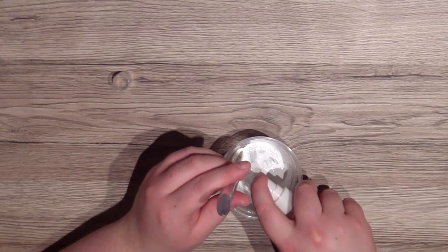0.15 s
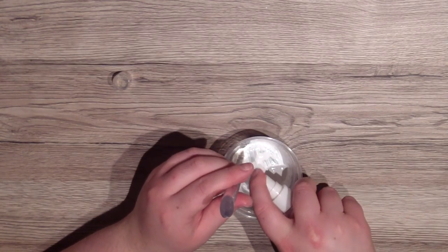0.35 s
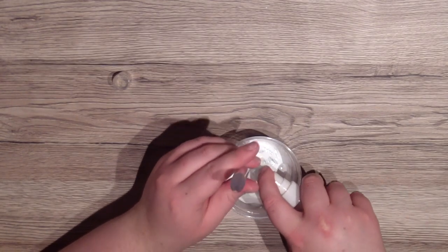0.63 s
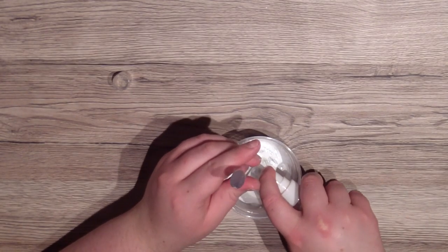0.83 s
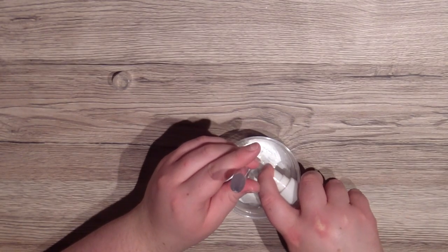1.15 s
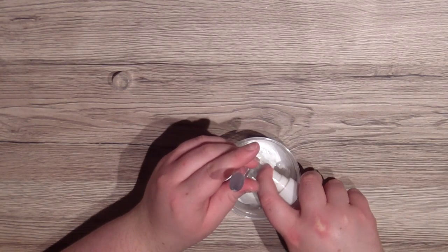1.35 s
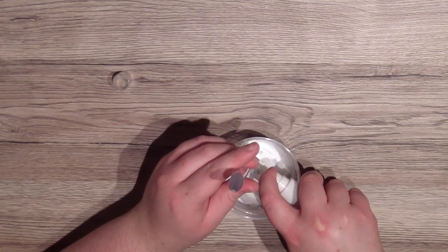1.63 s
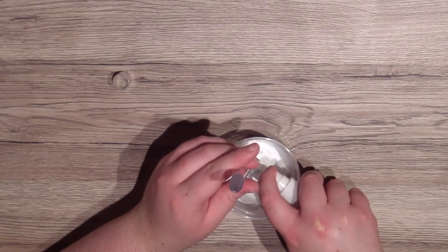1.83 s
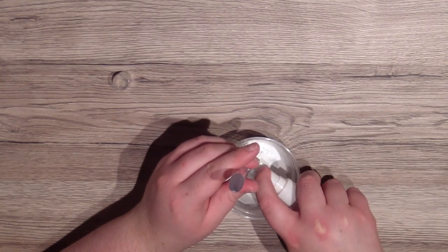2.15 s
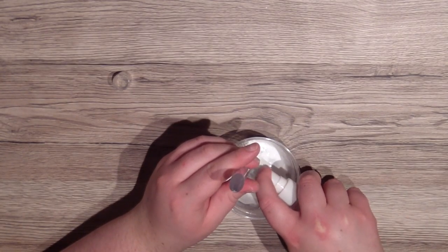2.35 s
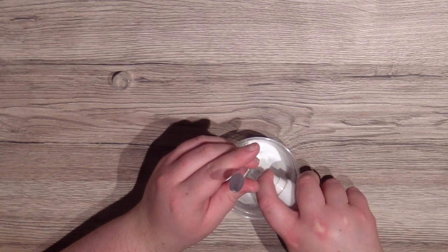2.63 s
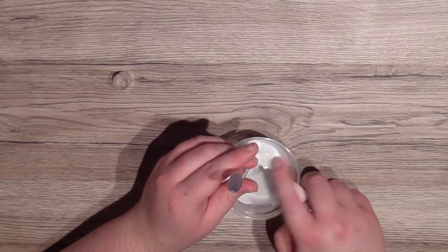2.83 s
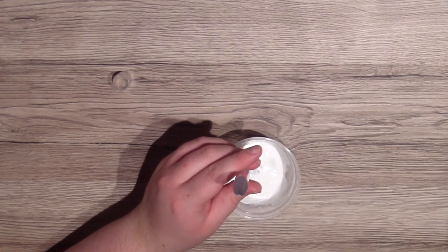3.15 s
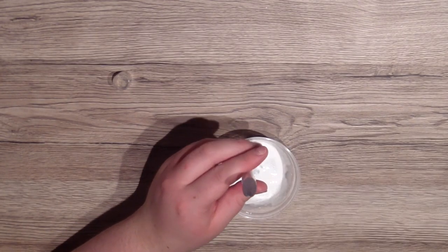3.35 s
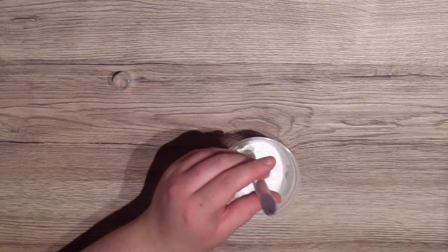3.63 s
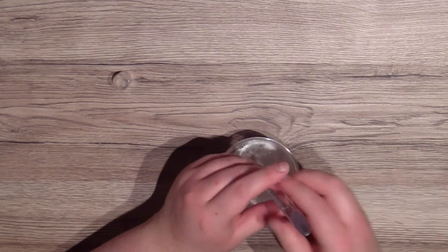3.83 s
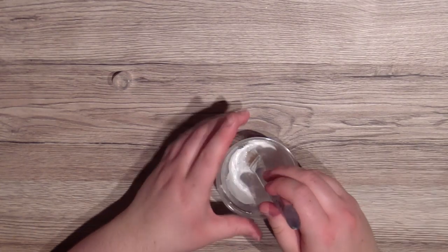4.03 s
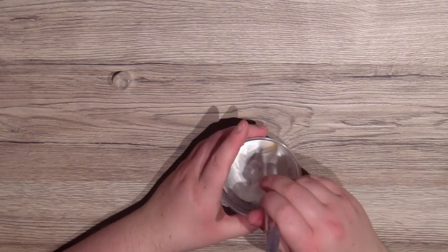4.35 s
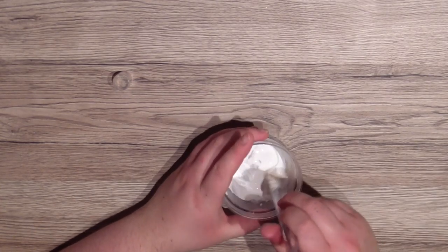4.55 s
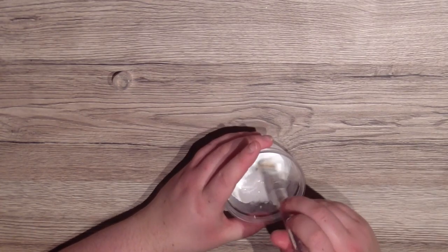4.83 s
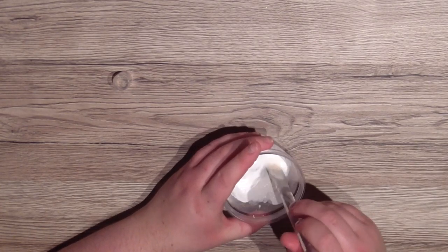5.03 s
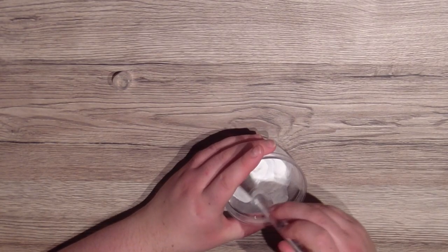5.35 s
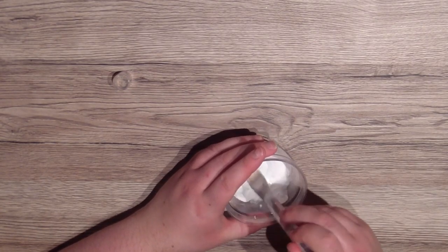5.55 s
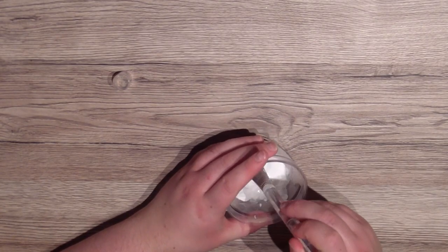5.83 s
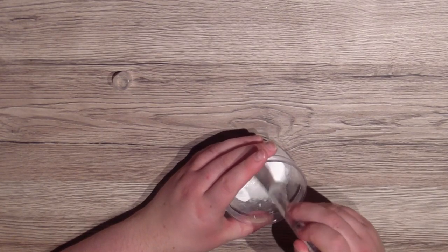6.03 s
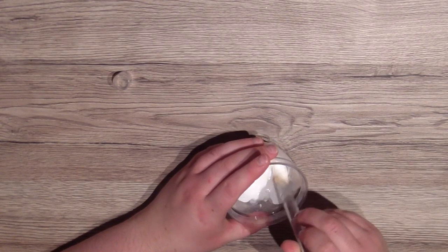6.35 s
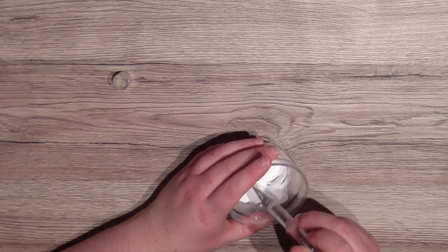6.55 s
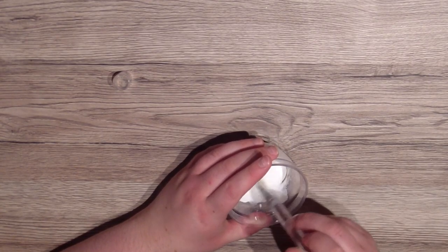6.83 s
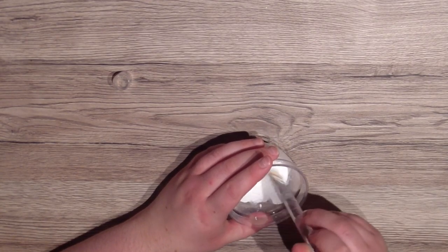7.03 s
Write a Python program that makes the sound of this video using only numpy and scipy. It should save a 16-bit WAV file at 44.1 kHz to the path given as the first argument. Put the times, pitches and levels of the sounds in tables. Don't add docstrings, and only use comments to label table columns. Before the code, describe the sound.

A pump bottle snaps about five times a second, squirting into a cup, before being thumped down on wood; faint wet stirring follows.

```python
import sys
import numpy as np
from scipy import signal
from scipy.fft import rfft, irfft, next_fast_len
from scipy.io import wavfile

SR = 44100
rng = np.random.default_rng(int(sys.argv[2]) if len(sys.argv) > 2 else 0)


def materialize(psi):
    bounded = np.clip(np.atleast_2d(psi).T, -1, 1)
    quanta = np.round(bounded * 32767).astype(np.int16)
    wavfile.write(sys.argv[1], SR, quanta)


def level_to_linear(level):
    exponent = np.asarray(level, float) / 20
    return 10 ** exponent


N = 317079

# (frequency [Hz], density [dB per Hz])
TONE_SPECTRUM = [(12, -52), (20, -1.5), (31, -13.5), (53, 1.5), (77, -13), (114, -8.5), (174, -17),
                 (237, -13.5), (351, -18), (428, -17), (1350, -27), (2510, -27.5), (13900, -34.5),
                 (15200, -37), (16500, -45)]
# (frequency [Hz], correlation [0-1])
TONE_LIKENESS = [(40, 0.84), (130, 0.55), (600, 0.59), (1500, 0.32), (4000, 0.096), (15000, 0.15)]
# (time [s], level [dB])
RUMBLE_SWELL = [(0.0, -46), (0.44, -76), (0.88, -52.5), (1.96, -63), (2.26, -59), (2.54, -59), (3.36, -64),
                (3.54, -47), (5.08, -55.5), (5.69, -44.5), (6.37, -55), (7.19, -48)]
# (time [s], level [dB])
TRICKLE_LEVEL = [(0, -43), (.06, -59), (.15, -59), (.4, -63.5), (.62, -61), (.9, -57), (2.8, -66),
                 (2.95, -70), (7.19, -71)]
# (time [s], length [s], wall ring [dB], rim ring [dB], wet hiss [dB])
CUP_STROKES = [(0.001, 0.028, -61, -70, -63), (2.99, 0.043, -80, -72, -63), (4.054, .04, -63, -64, -64.5),
               (4.174, 0.046, -64, -53, -58), (4.228, 0.18, -68, -56, -64.5),
               (4.394, 0.13, -70, -61.5, -59), (4.566, 0.035, -56, -58, -60.5),
               (4.67, 0.13, -55.5, -81, -62.5), (4.827, 0.12, -58, -62, -58), (5.01, 0.1, -56.5, -66, -62),
               (5.144, 0.095, -56.5, -70, -60.5), (5.333, 0.17, -66, -73, -61.5),
               (5.627, 0.097, -58.5, -79, -59.5), (5.863, 0.1, -57.5, -81, -61.5),
               (6, 0.052, -62.5, -78, -70), (6.111, 0.067, -53, -70, -58), (6.277, 0.073, -56, -60.5, -62),
               (6.359, .13, -61, -82, -59.5), (6.514, 0.053, -69, -61, -85),
               (6.725, 0.032, -52.5, -53, -62), (6.785, 0.065, -55, -70, -61), (6.903, 0.17, -66, -85, -66),
               (7.07, 0.089, -56.5, -59, -59.5)]
# (frequency [Hz], density [dB per Hz])
FILM_SPECTRUM = [(1060, -26), (1800, 1.5), (2790, -4), (3320, 2.5), (5490, -3), (9000, 4), (15100, -1),
                 (16000, -58.5)]
# (time [s], level [dB], frequency [Hz], T60 [s])
NICKS = [(.009, -31, 500, .03), (.194, -31, 505, .035), (.662, -22, 9000, .001), (.6622, -25, 4200, .002),
         (.663, -27, 2450, .035), (1.177, -31, 5000, .0015), (2.835, -39, 7800, .012),
         (3.439, -20, 13000, .001), (3.946, -35, 1950, .012), (3.947, -36, 4100, .008),
         (4.713, -36, 5600, .002), (4.7135, -27, 1290, .02), (4.903, -35, 2800, .006),
         (4.915, -40, 3300, .01), (4.925, -38, 3800, .01), (4.945, -38, 9000, .004), (6.25, -40, 620, .06),
         (6.28, -41, 650, .05), (6.74, -38, 3500, .008), (6.757, -39, 3700, .008), (6.772, -38, 3300, .008)]
# (time [s], peak [dB], low body re peak [dB], valve ball re peak [dB],
# grip [dB], where a squeezed bottle favours its lowest mode)
HEAD_DOWN = [(0.193, -8, -18.5, -11, -0.5), (0.7333, -10.5, -13.5, -4, 2.5), (0.9608, -7, -13, -6, -0.5),
             (1.19, -8, -11, -5, 0.5), (1.3984, -6.5, -14, -7.5, 0), (1.5979, -5.5, -13.5, -8, 0),
             (1.8104, -5.5, -14, -10.5, 1.5), (2.0006, -7.5, -13.5, -7.5, 4.5),
             (2.2018, -5.5, -13.5, -6.5, 0), (2.3946, -5, -14.5, -6.5, 0.5), (2.585, -7.5, -10.5, -3, -2)]
# (time [s], peak [dB], low body re peak [dB])
HEAD_BACK = [(0.3668, -28, -36), (0.8959, -29.5, -0.5), (1.0942, -27.5, -5.5), (1.3176, -27.5, -24),
             (1.52, -27, -11), (2.1236, -29, -9), (2.515, -31, -15), (2.714, -43, -23)]
# (frequency [Hz], density [dB per Hz])
SNAP_SPECTRUM = [(590, -25.5), (1000, -4), (1700, -6.5), (2800, -6), (3900, -3.5), (6310, -11),
                 (6770, -2.5), (11200, -2.5), (15600, -15), (16500, -3.5)]
# (frequency [Hz], level [dB], T60 [s])
BOTTLE_MODES = [(400, -6.5, 0.036), (609.6, -1, 0.068), (1750, -5, 0.025), (1990, -4.5, 0.034),
                (2170, 2.5, 0.0077), (2370, -4, 0.017), (2660, -15, .02)]
# (time [s], peak [dB], base share [dB], wall share [dB], push into the table [dB])
CUP_BUMPS = [(0.6623, 0.5, -24, -0.5, -21.5), (0.666, -22, -2, 11, -40), (0.671, -22, -14, 14, -40),
             (0.678, -35, -13, 10, -40), (0.688, -26, -16, 8, -40), (0.6962, -24, -7, 10, -33),
             (0.705, -25, -2, 12, -40), (0.7205, -34, -17, -3, -40), (0.7262, -27, -17, -6, -40),
             (0.7472, -19, -16, 3, -40), (0.756, -30, -13, -5, -40), (0.861, -23, -12, 11, -8),
             (1.091, -30, -6, 14.5, -3), (1.098, -36, -8, 14, -30), (1.176, -12.5, -13, 6, -13.5),
             (1.326, -34.5, 5, 14, -21), (1.332, -32, 3, 9, -30), (2.749, -29, -5, 6, -23),
             (4.22, -35, 4, 7, -1), (4.713, -21.5, -1.5, 13, -26), (4.7172, -26, -1, -7, -30),
             (4.738, -46, -3, 3, -26), (4.777, -46, -3, 6, -26), (5.36, -34.5, -19, -11, -26),
             (6.11, -36, -19, -7, -22), (6.77, -45, -4, -8, -20), (6.806, -35, -11, -5, -26)]
# (frequency [Hz], level [dB], T60 [s])
CUP_MODES = [(385, 2, 0.025), (560, -3, 0.04), (662, 2, 0.042), (895, -18, 0.027), (1010, 1, 0.012),
             (1055, -21.5, 0.022), (1127, -3, 0.019), (1287, 2, 0.021), (1318, 5, 0.028),
             (1480, 8.5, 0.023), (1610, -7, 0.016)]
# (time [s], level [dB], T60 [s])
WALL_CHATTER = [
    (0.6615, -30, 0.062),
    (0.664, -49, 0.18),
    (0.696, -50, 0.071),
    (1.1765, -35.5, 0.07),
]
# (frequency [Hz], density [dB per Hz])
CHATTER_SPECTRUM = [(1200, -27), (1900, 9), (2500, -11), (3300, -4), (5000, -12.5), (9000, -16),
                    (15000, -20)]
# (valve opens [s], stays open [s], level [dB], cup ring re jet [dB])
WATER_JETS = [(0.998, 0.061, -23, -34), (1.229, 0.052, -24, -23), (1.43, 0.056, -23, -17),
              (1.628, 0.065, -23, -18), (1.841, 0.063, -23, -23), (2.033, 0.056, -23.5, -18),
              (2.231, 0.067, -22, -13.5), (2.424, 0.06, -22.5, -17.5), (2.617, 0.073, -23, -13)]
# (frequency [Hz], density [dB per Hz])
MIST_SPECTRUM = [(410, -33), (700, -49), (768, -21), (1050, -12.5), (1200, -30), (1630, 1), (1790, -12.5),
                 (3120, -5.5), (5960, -9.5), (8520, -3.5), (14500, -2), (15900, -5.5), (16500, -51)]
# (frequency [Hz], density [dB per Hz])
DROP_SPECTRUM = [(700, -23), (1600, 12), (3000, -25), (4600, 5), (5100, 17), (5700, -18), (9000, -18),
                 (14000, -22), (16000, -22)]
# (time [s], base [dB], push into the table [dB])
LANDING = [
    (3.439, -3, -5),
    (3.4425, -10, -32),
    (3.4514, -28, -17),
    (3.47, -21, -20),
    (3.4909, -22, -26),
    (3.503, -28, -31),
    (3.525, -26.5, -33),
]
# (frequency [Hz], level [dB], T60 [s])
TABLE_MODES = [(65.8, 6, 0.46), (91.6, -6, 0.55), (127.9, 1, 0.38), (149, -4, 0.5), (197, -1.5, 0.32),
               (245.7, -5, 0.56), (247, 2, 0.18), (275, -18, 0.2), (317.5, 3.5, 0.26), (402, -2, 0.23),
               (419, 2, 0.26), (483, -14, 0.3), (524, -30, 0.17), (635, -20, .2)]
# (frequency [Hz], level [dB], T60 [s])
BASE_MODES = [(725, -19, 0.081), (780, -17, 0.033), (1050, -13, .12), (1147, -15, 0.06), (1250, -14, 0.066),
              (1308, -2, 0.098), (1380, -3.5, 0.071), (1472, -23, 0.095), (1640, -22, 0.039),
              (1970, -30, 0.044), (2410, -6, 0.025), (2645, -3, 0.016), (2920, -26, 0.044),
              (4220, -35, 0.0099)]
# (frequency [Hz], density [dB per Hz])
RATTLE_SPECTRUM = [(260, 0.5), (450, 1.5), (600, -6), (748, -5.5), (919, -11), (1040, -7), (1300, -6),
                   (1730, -15.5), (3040, -17), (3340, -24), (4050, -20), (5120, -32.5), (9240, -30.5),
                   (12000, -45), (15600, -36), (22000, -120)]
# (time [s], peak [dB])
LOOSE_HEAD = [(3.453, -25), (3.4644, -33), (3.469, -22.5), (3.4844, -31), (3.5034, -37), (3.5164, -44),
              (3.5254, -39), (3.5523, -48), (3.553, -42)]
# (time [s], length [s], level [dB])
FINGER_SLIPS = [
    (3.88, .075, -68),
    (3.97, .045, -61),
    (4.03, .05, -53),
    (4.095, .05, -51),
]
# (frequency [Hz], T60 [s])
ROOM_DECAY = [(60, .45), (300, .4), (1500, .4), (4000, .36), (8000, .29), (14000, .24)]
# (frequency [Hz], side re mid [dB])
ROOM_WIDTH = [(60, -13), (300, -29), (1500, -30), (5000, -34), (14000, 0)]
# (frequency [Hz], level [dB])
ROOM_LEVEL = [(200, -0.5), (600, -3), (1400, -5.5), (3000, -8), (6000, -6), (12000, -15)]
# (frequency [Hz], side re mid [dB])
NEAR_WIDTH = [(300, -23), (1500, -35.5), (4000, -36), (8000, -14.5), (11000, -20), (14000, -6.5)]


def in_time(rows):
    s, *columns = np.transpose(rows)
    return [np.interp(np.arange(N) / SR, s, c) for c in columns]


def at_hz(points, hz):
    table = np.array(points)
    return np.interp(np.log(hz + 1), np.log(table[:, 0]), table[:, 1])


def coloured(spectrum, white):
    count = white.shape[-1]
    size = next_fast_len(count)
    gain = level_to_linear(at_hz(spectrum, np.arange(size // 2 + 1) * SR / size))
    x = irfft(rfft(white, size) * gain, size)[..., :count]
    return x / np.sqrt(np.mean(x ** 2))


def gritty(spread_db):
    return rng.standard_normal(N) * level_to_linear(spread_db * np.minimum(rng.exponential(1, N), 5))


def drift(rate):
    r = np.exp(-2 * np.pi * rate / SR)
    slow = signal.lfilter([1], [1, -2 * r, r * r], rng.standard_normal(N + SR))[SR:]
    return slow / slow.std()


def spikes(times, levels_db):
    out = np.full(N, 1e-18)
    out[np.round(np.asarray(times) * SR).astype(int)] = level_to_linear(levels_db)
    return out


def fading(x, t60):
    return signal.lfilter([1], [1, -level_to_linear(-60 / (t60 * SR))], x)


def ring(x, hz, t60):
    r = level_to_linear(-60 / (t60 * SR))
    w = 2 * np.pi * hz / SR
    return signal.lfilter([0, np.sin(w)], [1, -2 * r * np.cos(w), r * r], x)


def passed(x, hz, kind):
    return signal.sosfilt(signal.butter(2, hz, kind, fs=SR, output="sos"), x)


def unit(x):
    return x / x.std()


def strike(times, levels_db, modes, scatter_db, chatter_s, chatter, sign=-1):
    levels_db = levels_db + scatter_db * rng.standard_normal((len(times), len(modes)))
    grains = chatter * gritty(7.48) / np.sqrt(chatter_s * SR / 7)
    out = 0
    for k, (hz, db, t60) in enumerate(modes):
        blows = spikes(times, levels_db[:, k] + db)
        burst = fading(blows, chatter_s) * np.roll(grains, 997 * k)
        out = out + sign ** k * ring(blows + burst, hz, t60)
    return out


def stroke(start, length, attack_s, release_db_per_s):
    span = slice(int(start * SR), min(N, int((start + length + .4) * SR)))
    t = np.arange(span.start, span.stop) / SR - start
    gain = np.clip(t / attack_s, 0, 1) * level_to_linear(-release_db_per_s * np.clip(t - length, 0, 1))
    return span, gain, np.clip(t / length, 0, 1)


def floor():
    likeness = [(hz, np.clip(c, 0, .99)) for hz, c in TONE_LIKENESS]
    mid = [(hz, 10 * np.log10(1 + c)) for hz, c in likeness]
    side = [(hz, 10 * np.log10(1 - c)) for hz, c in likeness]
    hiss = coloured(TONE_SPECTRUM, rng.standard_normal((2, N)))
    grid = np.arange(N // 2 + 1) * SR / N
    both, apart = (irfft(rfft(h) * level_to_linear(at_hz(p, grid)), N) / 2 ** .5 for h, p in zip(hiss, (mid, side)))
    tone = level_to_linear(-46.5) * (both + apart * [[1], [-1]])

    wander = 1 + 0.049 * drift(2.97)
    swell = level_to_linear(in_time(RUMBLE_SWELL)[0] + 2.0 + 2 * drift(2.4))
    rumble = swell * np.sin(2 * np.pi * np.cumsum(50 * wander) / SR)

    turn = 2 * np.pi * np.arange(N) / SR
    throb = 1 + .5 * np.sin(50 * turn)
    whine = level_to_linear(-64 + 1.5 * drift(5.0)) * throb * np.sin(15650 * turn)
    return tone + rumble * level_to_linear([[1.2], [-1.2]]) + whine * level_to_linear([[1.5], [-1.5]])


def settling():
    cavity_hz = 1476
    trickle = gritty(2.4) * level_to_linear(2.5 * drift(18))
    air = ring(ring(trickle, cavity_hz, 0.014), cavity_hz, 0.002)
    return level_to_linear(in_time(TRICKLE_LEVEL)[0]) * unit(air)


def stirring():
    attack_s, lift_db_per_s = 0.014, 409
    ring_sag_db, film_rise_db = 1, 5.5
    wall_gain, rim_gain, hiss_gain = np.zeros((3, N))
    for start, length, wall_db, rim_db, hiss_db in CUP_STROKES:
        span, contact, along = stroke(start, length, attack_s, lift_db_per_s)
        wall_gain[span] += contact * level_to_linear(wall_db - ring_sag_db * (along - 2.0))
        rim_gain[span] += contact * level_to_linear(rim_db - ring_sag_db * (along - 2.5))
        hiss_gain[span] += contact * level_to_linear(hiss_db + film_rise_db * (along - .5))
    slips = gritty(4.1) * level_to_linear(3.8 * drift(33))
    wall = ring(slips, 1315, 0.018) - 0.7 * ring(slips, 1170, 0.016) - 0.7 * ring(slips, 1470, 0.015)
    wall = wall + level_to_linear(-14) * ring(slips, 3300, 0.012)
    rim = ring(slips, 1510, 0.03) - 0.9 * ring(slips, 1790, 0.022) + 0.3 * ring(slips, 2080, 0.015)
    hiss = coloured(FILM_SPECTRUM, gritty(3.2)) * level_to_linear(2.0 * drift(63))
    ringing = level_to_linear(4.5) * wall_gain * unit(wall) + level_to_linear(1.0) * rim_gain * unit(rim)
    return passed(ringing, 1420, "high") + level_to_linear(5.5) * hiss_gain * hiss


def nicks():
    return sum(ring(spikes([at], db), hz, t60) for at, db, hz, t60 in NICKS)


def pump():
    s, db, low_db, ball_db, grip_db = np.transpose(HEAD_DOWN)
    back_s, back_db, back_low_db = np.transpose(HEAD_BACK)
    plastic = coloured(SNAP_SPECTRUM, gritty(1.9))
    crisp = unit(signal.lfilter([1, -.6], [1], plastic))
    head = fading(spikes(s + 0.00039, db + 6.5), 0.019) + fading(spikes(back_s, back_db + 15), 0.02)
    ball = fading(spikes(s + 0.00407, db + ball_db + 0.5), 0.086)
    head_burst, ball_burst = signal.lfilter([.2], [1, -.8], [head, ball])

    upper = len(BOTTLE_MODES) - 2
    neck_db = np.tile(db[:, None] - 12.5, upper)
    press_db = np.c_[db + low_db + grip_db, db + low_db - grip_db, neck_db]
    release_db = np.tile((back_db + back_low_db - 8)[:, None], len(BOTTLE_MODES))
    hits_s = np.r_[s, s + .0045, back_s]
    hits_db = np.r_[press_db - 6, press_db - 10, release_db]
    body = strike(hits_s, hits_db, BOTTLE_MODES, scatter_db=1, chatter_s=0.05, chatter=0.068)
    return level_to_linear(-11.0) * (head_burst * crisp + ball_burst * plastic) + passed(body, 190, "high")


def bumps():
    s, db, base_db, wall_db, push_db = np.transpose(CUP_BUMPS)
    hz = np.array(CUP_MODES)[:, 0]
    share_db = np.where(hz < 700, base_db[:, None], np.where(hz < 1200, wall_db[:, None], 0))
    level_db = db[:, None] - 14 + share_db
    shell = strike(s, level_db[:, :7], CUP_MODES[:7], 1.5, chatter_s=0.05, chatter=0.11, sign=1)
    hollow = strike(s, level_db[:, 7:], CUP_MODES[7:], 1.5, chatter_s=0.05, chatter=0.07, sign=1)
    taps = passed(shell + passed(hollow, 1020, "high"), 226, "high")
    soft = signal.butter(6, 1620, fs=SR, output="sos")
    taps = passed(signal.sosfilt(soft, taps), 226, "high")
    push = ring(spikes(s, db + push_db - 5.0), 57.7, 0.18) - ring(spikes(s, db + push_db - 7.5), 124.5, 0.18)
    return taps + passed(passed(push, 160, "low"), 160, "low")


def clatter():
    decay = sum(fading(spikes([at], db), t60) for at, db, t60 in WALL_CHATTER)
    return decay * coloured(CHATTER_SPECTRUM, gritty(2.2))


def spray():
    arch_db, swell_db = .8, -1
    flow, landing, dripping = np.zeros((3, N))
    for opens, length, db, cup_db in WATER_JETS:
        span, gate, along = stroke(opens, length, 0.002, 1000)
        gate = gate * level_to_linear(arch_db * np.sin(np.pi * along) + swell_db * along)
        dribble = level_to_linear(-18.5) * stroke(opens, length, 0.01, 185)[1]
        flow[span] += gate * level_to_linear(db - 1.5)
        dripping[span] += dribble * level_to_linear(db - 3.5)
        landing[span] += gate * np.clip(.3 + 3.0 * along, 0, 1) * level_to_linear(db + cup_db)
    drops, jet = gritty(7.5), gritty(0.33)
    hollow = ring(drops, 1500, 0.024) + .9 * ring(drops, 1700, 0.027)
    cup = landing * unit(passed(hollow, 2150, "high"))
    mist = flow * level_to_linear(0.47 * drift(63)) * coloured(MIST_SPECTRUM, gritty(0.92))
    nozzle = flow * level_to_linear(-10.0) * unit(ring(jet, 8630, .005))
    treble = passed(passed(np.roll(jet, SR), 12000, "high"), 12000, "high")
    fan = flow * level_to_linear(-35) * unit(treble)
    return mist + dripping * coloured(DROP_SPECTRUM, jet) + cup + nozzle, fan


def thud():
    s, db, board_db = np.transpose(LANDING)
    board = sum(ring(spikes(s, board_db + level_db - 13.5), hz, t60) for hz, level_db, t60 in TABLE_MODES)
    board = passed(passed(board, 65, "high"), 65, "high")
    loose = coloured(RATTLE_SPECTRUM, gritty(1.8))
    buzz = fading(spikes(s, db - 10), 0.014) + fading(spikes(s, db - 19.5), 0.29) * level_to_linear(5.3 * drift(55))
    tick_s, tick_db = np.transpose(LOOSE_HEAD)
    bright = unit(passed(passed(loose, 5600, "high"), 5600, "high"))
    head = fading(spikes(tick_s, tick_db - 10.0), 0.011) * bright
    base = strike(s, db[:, None] - 13.5, BASE_MODES, 0, chatter_s=0.061, chatter=0.051)
    return board, base + passed(buzz * loose, 120, "high") + head


def squeak():
    top_hz, start_hz, rise_s, climb_hz = 15800, 10200, 0.067, 404
    since = np.clip(np.arange(N) / SR - FINGER_SLIPS[0][0], 0, None)
    hz = top_hz - (top_hz - start_hz) * np.exp(-since / rise_s)
    gain = np.zeros(N)
    for start, length, db in FINGER_SLIPS:
        span, contact, along = stroke(start, length, 0.013, 900)
        gain[span] += contact * level_to_linear(db + 4.8 * (1.0 + along))
        hz[span] += climb_hz * (along - .5) * np.clip(2 * contact, 0, 1)
    phase = 2 * np.pi * np.cumsum(hz * (1 + 0.0035 * drift(80))) / SR
    return gain * level_to_linear(3.3 * drift(50)) * np.sin(phase)


def room(x, gap_s):
    t = np.arange(SR // 2) / SR
    white = rng.standard_normal((2, len(t)))
    echoes = 0
    for k, hz in enumerate(45 * 2. ** np.arange(0, 8.6, .5)):
        edges = [hz / 2 ** .25, min(hz * 2 ** .25, .45 * SR)]
        band = signal.butter(2, edges, "band", fs=SR, output="sos")
        mid, side = signal.sosfilt(band, np.roll(white, 1009 * k, axis=1))
        t60 = at_hz(ROOM_DECAY, hz)
        pair = mid + level_to_linear(at_hz(ROOM_WIDTH, hz)) * side * [[1], [-1]]
        echoes = echoes + pair * level_to_linear(at_hz(ROOM_LEVEL, hz) - 60 * t / t60) / np.sqrt(t60 * SR / 14)
    echoes = echoes * np.clip(t / gap_s, 0, 1)
    return signal.fftconvolve(x[None], echoes, axes=1)[:, :N]


def scene():
    jets, fan = spray()
    near = settling() + stirring() + nicks() + pump() + bumps() + clatter() + jets + squeak()
    flat = [(300, 0), (16000, 0)]
    scatter = coloured(flat, rng.standard_normal(2000)) * level_to_linear(-np.arange(2000) * .025) / 12
    grid = np.arange(N // 2 + 1) * SR / N
    side = irfft(rfft(near) * rfft(scatter, N) * level_to_linear(at_hz(NEAR_WIDTH, grid)), N)
    direct = near * level_to_linear([[.2], [-.2]]) + (side + fan) * [[-1], [1]]

    board, base = thud()
    far_db, board_wet_db = 4, -11
    far = room(base + level_to_linear(board_wet_db - far_db) * board, 0.005)
    echoes = room(near, .007) + level_to_linear(far_db) * passed(far, 63, "high")
    return direct + (board + base) * level_to_linear([[.2], [-.2]]) + echoes + floor()


def band_limit(x):
    return signal.sosfilt(signal.butter(12, 16970, fs=SR, output="sos"), x)


def record(dry):
    low_pass = signal.ellip(12, .3, 45, 15740, fs=SR, output="sos")
    mix = signal.sosfilt(low_pass, dry)
    return band_limit(mix)


dry = scene()
out = record(dry)
materialize(out)
```